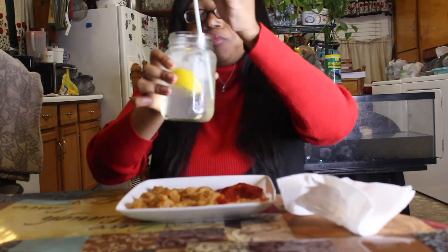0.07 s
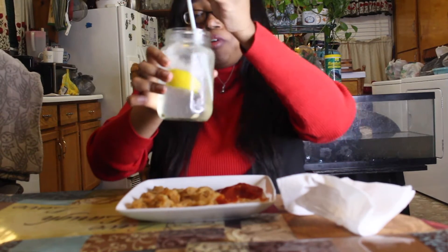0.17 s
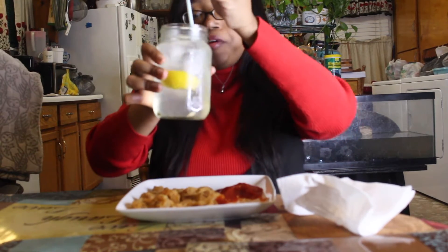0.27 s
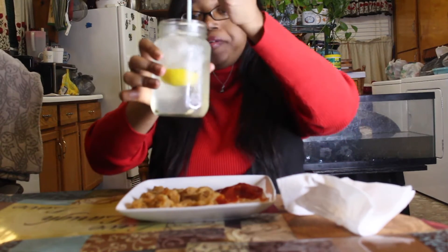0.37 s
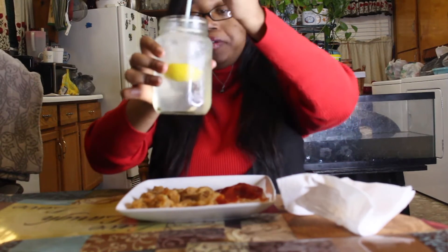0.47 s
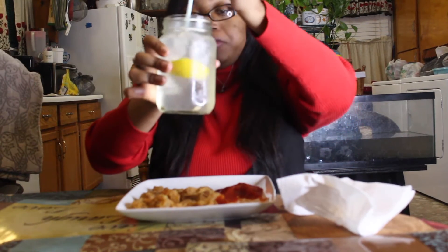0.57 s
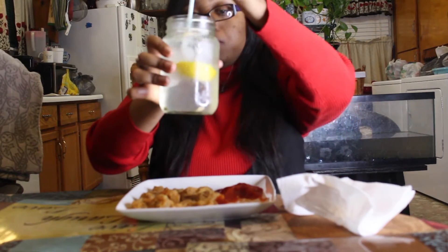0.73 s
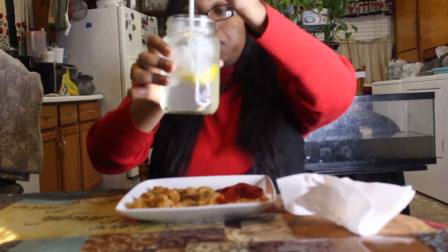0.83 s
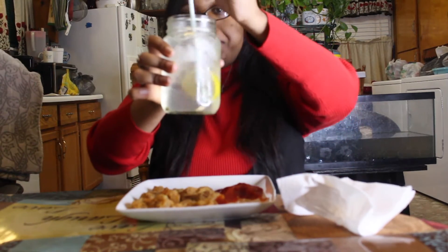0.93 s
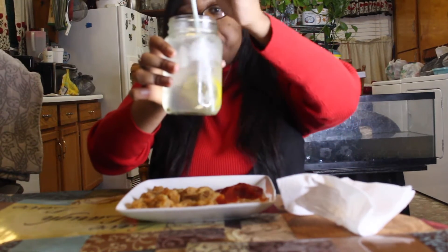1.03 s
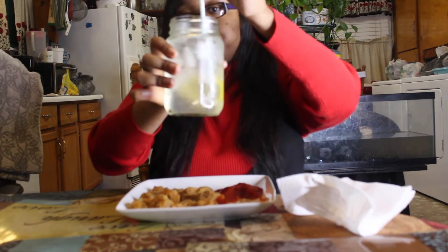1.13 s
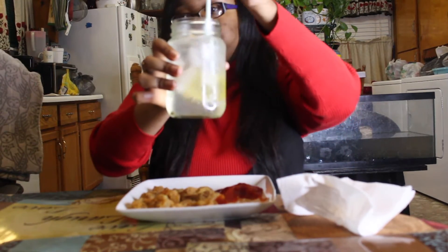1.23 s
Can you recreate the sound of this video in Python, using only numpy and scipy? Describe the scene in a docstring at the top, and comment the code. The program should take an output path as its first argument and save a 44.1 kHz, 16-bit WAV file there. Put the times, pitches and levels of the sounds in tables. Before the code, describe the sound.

Ice cubes clink lightly and unevenly against a glass jar as the water is stirred. The water swishes faintly, and the clinks get a little louder before thinning out, close by in a quiet kitchen with a low hum.

```python
"""Ice in a jar of water

Ice cubes knock about in a glass jar of water tilted by hand in a quiet kitchen. Water and fingers
damp the glass, so each knock is a short clink; where the cube lands decides which wall modes ring,
and the rim sings on faintly. Cubes also bump dully in the swishing, gulping water and tick faintly
in between. The room adds a short tail and a low hum."""
import sys
import numpy as np
from scipy import signal
from scipy.fft import rfft, irfft
from scipy.io import wavfile

SR = 44100
rng = np.random.default_rng(int(sys.argv[2]) if len(sys.argv) > 2 else 0)


def transcribe(u):
    """Save the signal u as a 16-bit wav file named by the first command-line argument.

    u: samples, shape (n,) or (channels, n), limited to [-1, 1]; the rate is SR.
    q: integer samples, one column per channel.
    """
    v = np.clip(np.atleast_2d(u).T, -1, 1)
    q = np.round(v * 32767).astype(np.int16)
    wavfile.write(sys.argv[1], SR, q)


N = 57330

# Colour of the room tone. Each row: frequency in Hz, relative level in dB.
ROOM_TONE = [(20, -31), (34, 1.5), (60, -4), (196, -4), (281, -9), (383, -6), (728, -13), (1190, -12.5),
             (1540, -15.5), (2040, -14), (2440, -17.5), (3410, -17.5), (6500, -23.5), (14800, -25),
             (16000, -27)]
# A faint hiss that differs between the channels. Each row: frequency in Hz, side level against mid in dB.
SIDE_HISS = [(30, -14), (600, -12), (1200, -13), (2200, -31.5), (4000, -17), (8000, -1), (12000, -1)]
# Appliance hum. Each row: pitch in Hz, level in dB.
HUM_PARTIALS = [(60, -73), (120, -81.5), (192, -71), (255, -85), (338, -72.5)]
# Slaps off hand, body and table. Each row: delay in seconds, level in dB.
NEAR_ECHOES = [(.0036, -27), (.0062, -35)]
# Length of the kitchen's tail. Each row: frequency in Hz, seconds to fall 60 dB.
TAIL_DECAY = [(300, 0.15), (2000, 0.3), (5000, 0.3), (12000, 0.21)]
# Colour of that tail. Each row: frequency in Hz, relative level in dB.
TAIL_COLOUR = [(500, 2), (2000, 0), (3500, -3), (5500, -1), (9000, -2.5), (15000, -2.5)]
# Soft, low handling. Each row: centre and half length in seconds, pitch and width in Hz, level in dB.
HAND_SWELLS = [(.75, 0.014, 358, 91, -63), (1.14, 0.021, 270, 69.5, -63.5), (1.27, 0.036, 343, 143, -60.5)]
# Water swishing round the cubes. Each row reads as in HAND_SWELLS.
WATER_SWISHES = [(.2, 0.015, 620, 304, -56.5), (.2, 0.032, 1380, 600, -58.5), (.335, 0.021, 1250, 515, -56),
                 (.6, 0.061, 1270, 670, -58.5), (.78, 0.065, 1210, 606, -60.5)]
# Air pockets gulping as the water shifts. Each row: start in seconds, pitch in Hz, level in dB.
AIR_GULPS = [(.162, 430, -54), (.191, 535, -53), (.2175, 632, -45.5)]
# Dull bumps of ice under water. Each row: start in seconds, level in dB.
ICE_BUMPS = [(0.452, -52), (0.498, -51.5), (0.5227, -49), (0.677, -41.5), (0.703, -51), (0.7917, -50.5),
             (0.8202, -50), (0.833, -50.5), (.904, -46.5), (0.9374, -48.5), (.948, -49.5), (0.9702, -49),
             (1.056, -55)]
# The voice of a bump. Each row: pitch in Hz, relative level in dB, seconds to fall 60 dB.
BUMP_VOICE = [(950, 1, 0.0075), (1123, 0.5, 0.017), (1249, -2, 0.025), (1420, 3.5, 0.0057)]
# The dry rim's after-ring. Each row: pitch in Hz, gain in dB, seconds to fall 60 dB.
RIM_MODES = [(2030, -8, 0.16), (2710, -14, 0.15), (3428, -11.5, 0.39), (4550, -11, 0.21)]
# Modes of the filled jar in five families: lowest, second, main, upper, edge.
# Each row of a family: pitch in Hz, level within the family in dB, seconds to fall 60 dB.
JAR_FAMILIES = [
    [(1954, 9, 0.014), (2103, 8, 0.013)],
    [(2801, 0, 0.0066)],
    [(3432, 0, .018), (3540, -3, .009)],
    [(4016, 0, 0.013), (4452, 8, 0.0042), (5110, -3.5, 0.013)],
    [(5740, 1, 0.0079), (6440, 0.5, 0.0043), (7897, -3, 0.013), (9340, -0.5, 0.0084)],
]
# One value a family: how well it radiates, in dB.
RADIATION_DB = [0.084, 0, 0, 0.041, 0.21]
# One value a family: its attack in seconds.
ATTACKS_S = [0.00054, 0.00042, 0.00053, 0.00037, 0.00028]
# One value a family: its boost or cut in a faint tick, in dB.
TICK_BALANCE_DB = [8, 1, -7, -4, -32]
# How much the ice jostles. Each row: time in seconds, base level of the ticks in dB.
JOSTLE_CURVE = [(0, -70), (.13, -98), (.19, -51.5), (.27, -69), (.36, -73), (.45, -71.5), (.62, -63.5),
                (.8, -60.5), (.97, -64.5), (1.1, -83.5), (1.3, -96)]
# Cube against glass. Each row: start in seconds, level of the lowest family in dB, then the second,
# main, upper and edge families against it in dB, and the favoured upper pitch in Hz.
ICE_KNOCKS = [(0.05, -46.5, -7.5, -6.5, -29, -16, 5100), (0.0641, -55, 4, 1, -18, -28, 4100),
              (0.0787, -45.5, -12, -6, -11, -33, 4500), (0.0882, -53, -1, -10, 3, -26, 4460),
              (0.155, -56, 7, -16, -18, -23, 3990), (0.1601, -49.5, -0.5, -9, -4.5, -29, 4000),
              (0.1842, -47, -1, -1.5, 1.5, -9, 4250), (0.208, -46.5, -1, 1, -8, -7.5, 4780),
              (0.2179, -46, 4, -8, 8, -2, 4440), (0.2214, -41, 4.5, -10, -2, -11, 4500),
              (.2405, -58, -1, -11, -10, -24, 4400), (0.2565, -49.5, 9, -6, -9, -10, 4440),
              (0.2674, -48, -16, -15, 0, -25, 4970), (0.2919, -37, 10, -7, 8.5, -5, 4430),
              (0.2952, -34.5, -17, -24, -22, -19, 4180), (0.3052, -43, -19, -12, 0, -13, 4160),
              (.3095, -52, 1, -11, -11, -13, 4050), (0.3244, -47, 7, 0, -13, -14, 4200),
              (0.332, -56.5, 9, 6, 3, -11, 4440), (0.3345, -40.5, -6, -14, -12, -23, 4440),
              (0.341, -59, 2, 1, 11, -15, 4500), (0.3542, -46, -21, -19, -4.5, -16, 4720),
              (0.381, -46, -12, -13, -14, -30, 4300), (0.397, -59, -3, -6, -12, -32, 4200),
              (0.4141, -53, 13, 9, 7.5, -5, 4560), (0.422, -41, -4, -6, -12, -16.5, 4550),
              (0.4274, -49.5, 8, -18, 0, -11, 4500), (0.45, -42.5, -36, -12, -11, -40, 4100),
              (0.4697, -45, -17, -12, -10.5, -32, 5100), (0.491, -61, -5, 13.5, -29, -21, 4600),
              (0.5234, -51.5, -18, -13, -5, -20, 4600), (0.5298, -51, -6, -1, -12, -18, 4360),
              (0.5539, -42.5, 2, -19, -7, -18, 3860), (0.567, -45.5, -9, -9, -9, -30, 4460),
              (0.575, -40.5, 1, -14, -16, -26, 4600), (.6295, -54, 2, -7, -4, -5.5, 4800),
              (0.6438, -47.5, -17, -10, -7, -22, 4260), (0.6502, -59.5, -13, 6, 7, -4, 4200),
              (0.6775, -41.5, -13, 0.5, -10, -34, 4800), (0.681, -43.5, -20, -15, -15, -7.5, 5260),
              (0.701, -31, -7.5, -3.5, -2, -19, 4380), (0.7278, -44.5, -3, 8.5, -2, -16, 4270),
              (0.7399, -51, -6, 2, -23, -25, 4500), (0.7815, -58, -10, 12, 4, 1, 5260),
              (0.791, -45.5, -23, -7, -2, -21, 4100), (0.8124, -61.5, 14, 16.5, 11, 3, 4400),
              (0.8196, -50.5, -1, -10, -11, -23, 4580), (0.8305, -32.5, -20, 13, 4, 1.5, 4400),
              (0.8477, -39, -9, 2, -2, -10, 4700), (0.8549, -46.5, -6, 3, 7.5, -18, 4150),
              (0.878, -55, 7, 15.5, 9, 0, 4450), (0.9032, -40.5, -11, -8, -11, -35, 4400),
              (0.9276, -36, -8, 4.5, -16, -14, 5000), (0.9374, -39.5, 6, 7.5, 5, -9.5, 5200),
              (0.9595, -39, -7, 1.5, -9, -21, 4500), (0.9703, -47, 2, 9.5, 8.5, -2, 4180),
              (0.9844, -51, 11.5, 8.5, -12, -12, 5070), (1.0187, -51, 2.5, -11, -22, -28, 4760),
              (1.0537, -43.5, -4.5, -3, -15, -24, 5100), (1.0724, -45.5, -1, -13, -9.5, -28, 4560),
              (1.0822, -51, 6.5, 1.5, -2, -25, 4570), (1.1193, -46.5, -23, -19, -12, -37, 4500),
              (1.178, -64.5, 12.5, -10, 7.5, -14, 4040), (1.2226, -45.5, -10, -2.5, -2, -9.5, 4300)]


def amp(db):
    """Decibels to gain."""
    return 10 ** (np.asarray(db) / 20)


def unit(x):
    """Scales to an rms of one."""
    return x / np.sqrt(np.mean(x ** 2) + 1e-20)


def curve(points, hz):
    """Reads a table on a log-frequency axis."""
    f, value = np.transpose(points)
    return np.interp(np.log(hz + 1), np.log(f + 1), value)


def add(mix, start_s, sound):
    """Drops a sound into the mix."""
    part = mix[max(round(start_s * SR), 0):][:len(sound)]
    part += sound[:len(part)]


def noise(gain):
    """Noise coloured by a gain over frequency."""
    return irfft(rfft(rng.standard_normal(N)) * gain(np.fft.rfftfreq(N, 1 / SR)), N)


def background(tone_db=-56, waver_rad=0.51, rumble_hz=7.43, rumble_db=-49.5):
    """The bed, as mid and side: hissy room tone, a wavering appliance hum and a deep rumble."""
    t = np.arange(N) / SR
    mid = noise(lambda f: amp(curve(ROOM_TONE, f)))
    side = noise(lambda f: amp(curve(ROOM_TONE, f) + curve(SIDE_HISS, f)))
    gain = amp(tone_db) / mid.std()
    hum = np.zeros(N)
    for hz, db in HUM_PARTIALS:
        phase = 2 * np.pi * (hz * t + rng.random())
        waver = waver_rad * unit(noise(lambda f: f < 10))
        hum += amp(db) * np.sqrt(2) * np.sin(phase + waver)
    rumble = unit(noise(lambda f: (f / rumble_hz) ** 2 * np.exp(-(f / rumble_hz) ** 2)))
    return gain * mid + hum + amp(rumble_db) * rumble, gain * side


def kitchen(dry, tail_db=-12.5, predelay_s=0.0045, graininess=2.8):
    """Close surfaces slap back, then a diffuse tail hangs longest in the upper mids."""
    near = dry.copy()
    for delay_s, db in NEAR_ECHOES:
        add(near, delay_s, amp(db) * dry)
    taps = rng.standard_normal(SR // 2)
    hz, t, spectrum = signal.stft(np.sign(taps) * abs(taps) ** graininess, SR, nperseg=256)
    fade_db = curve(TAIL_COLOUR, hz)[:, None] - 60 * t / curve(TAIL_DECAY, hz)[:, None]
    _, tail = signal.istft(spectrum * amp(fade_db), SR, nperseg=256)
    tail *= np.clip(np.arange(len(tail)) / SR / predelay_s - 1, 0, 1)
    tail /= np.linalg.norm(tail)
    return near + amp(tail_db) * signal.fftconvolve(dry, tail)[:N]


def swells(table):
    """Moving water or a shifting hand: bands of noise that fade in and out."""
    t = np.arange(N) / SR
    out = np.zeros(N)
    for centre_s, half_s, hz, width_hz, db in table:
        band = unit(noise(lambda f: 1 / (1 + (2 * (f - hz) / width_hz) ** 4)))
        out += amp(db) * np.exp(-((t - centre_s) / half_s) ** 2 / 2) * band
    return out


def gulps(swell_s=0.002):
    """Each air pocket swells and rings for a few cycles at a steady pitch."""
    t = np.arange(SR // 20) / SR
    envelope = t / swell_s * np.exp(1 - t / swell_s)
    out = np.zeros(N)
    for start_s, hz, db in AIR_GULPS:
        add(out, start_s, amp(db) * envelope * np.sin(2 * np.pi * hz * t))
    return out


def ring(modes, attack_s, scatter_db=4.5, detune=0.005, body_s=0.0042):
    """Struck modes die away, a shade different each hit, with the energy of body_s at unit rms."""
    t = np.arange(SR // 25) / SR
    wave = np.zeros(len(t))
    for hz, db, t60 in modes:
        louder, sharper = rng.standard_normal(2)
        envelope = amp(db + scatter_db * louder - 60 * t / t60)
        wave += envelope * np.sin(2 * np.pi * hz * (1 + detune * sharper) * t)
    wave *= (1 - np.exp(-t / attack_s)) ** 2.01
    return wave / np.sqrt(np.sum(wave ** 2) / (body_s * SR))


def bumps(low_cut_hz=750):
    """Cubes bump under the surface with a dull, short ring."""
    out = np.zeros(N)
    for start_s, db in ICE_BUMPS:
        add(out, start_s, amp(db) * ring(BUMP_VOICE, attack_s=0.00029))
    return signal.sosfilt(signal.butter(3, low_cut_hz, "high", fs=SR, output="sos"), out)


def rim(wall):
    """Narrow resonances of the rim pick up the knocks and outlast them."""
    out = np.zeros(N)
    for hz, db, t60 in RIM_MODES:
        q = np.pi * hz * t60 / np.log(1000)
        out += amp(db) * signal.lfilter(*signal.iirpeak(hz, q, fs=SR), wall)
    return out


def crack(samples, peak_s=0.00076, low_cut_hz=5760):
    """The brittle bite of the contact: a flick of bright noise."""
    age = np.arange(samples) / SR / peak_s
    burst = rng.standard_normal(samples) * age * np.exp(1 - age)
    return signal.lfilter(*signal.butter(2, low_cut_hz, "high", fs=SR), burst)


def chatter(touch, level_db, firm_db=-37, longest_gap_s=0.002476):
    """The cube touches twice; the firmer it lands, the weaker the second touch against the first."""
    rebound = amp(-1.5) / (1 + amp(level_db - firm_db))
    out = touch.copy()
    add(out, longest_gap_s * rng.uniform(0.4886, 1), rebound * touch)
    return out / np.hypot(1, rebound)


def clink(levels_db, favoured_hz, hard_db=-35, focus_db_per_octave=71, dull_db_per_octave=21):
    """One contact drives each family of jar modes with its own strength, topped with a crack."""
    lowest, second, main, upper, edge = JAR_FAMILIES
    # Upper modes away from the favoured pitch are driven less.
    upper = [(hz, db - focus_db_per_octave * abs(np.log2(hz / favoured_hz)), t60)
             for hz, db, t60 in upper]
    # Soft contacts last longer and lose the highest edge modes.
    edge_db = levels_db[-1]
    softness = 1 / (1 + amp(edge_db - hard_db) ** 2)
    edge = [(hz, db - dull_db_per_octave * softness * np.log2(hz / favoured_hz), t60)
            for hz, db, t60 in edge]
    wall = sum((-1) ** k * amp(levels_db[k] + RADIATION_DB[k]) * ring(modes, ATTACKS_S[k])
               for k, modes in enumerate([lowest, second, main, upper, edge]))
    crack_db = edge_db + 0.049 * (edge_db - hard_db)  # hard hits bite a little more
    return chatter(wall + amp(crack_db) * crack(len(wall)), max(levels_db))


def ice_on_glass(ticks_per_s=130, spread_db=4, low_cut_hz=1480):
    """Cubes hit the jar wall: clear knocks up front, a scatter of faint ticks between them."""
    out = np.zeros(N)
    for start_s, db, *colour_db, favoured_hz in ICE_KNOCKS:
        add(out, start_s, clink(db + np.array([0, *colour_db]), favoured_hz))
    upper_hz = [hz for hz, _, _ in JAR_FAMILIES[3]]
    chance = np.clip(rng.standard_normal((round(ticks_per_s * N / SR), 7)), -1.5, 1.5)
    for k, (late, size, *colour) in enumerate(chance):
        start_s = (k + late) / ticks_per_s
        jostle_db = np.interp(start_s, *np.transpose(JOSTLE_CURVE))
        levels_db = jostle_db + spread_db * (size + np.array(colour)) + TICK_BALANCE_DB
        add(out, start_s, clink(levels_db, rng.uniform(upper_hz[0], upper_hz[-1])))
    # The wall radiates little below its lowest mode.
    return signal.sosfilt(signal.butter(5, low_cut_hz, "high", fs=SR, output="sos"), out)


def scene():
    """The jar sits dead centre; only a faint hiss differs between the two channels."""
    bed, side = background()
    wall = ice_on_glass()
    water = bumps() + swells(WATER_SWISHES) + gulps()
    mid = kitchen(wall + rim(wall) + water) + swells(HAND_SWELLS) + bed
    return np.array([mid + side, mid - side])


def record(dry):
    """A steep high cut takes off the very top of the air."""
    high_cut_hz = 16100
    taps = signal.firwin(401, high_cut_hz, window=("kaiser", 8), fs=SR)
    return signal.oaconvolve(dry, taps[None], "same", axes=1)


dry = scene()
out = record(dry)
transcribe(out)
```